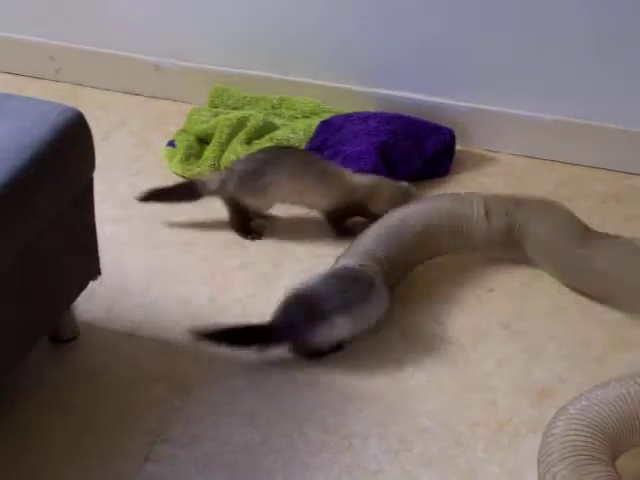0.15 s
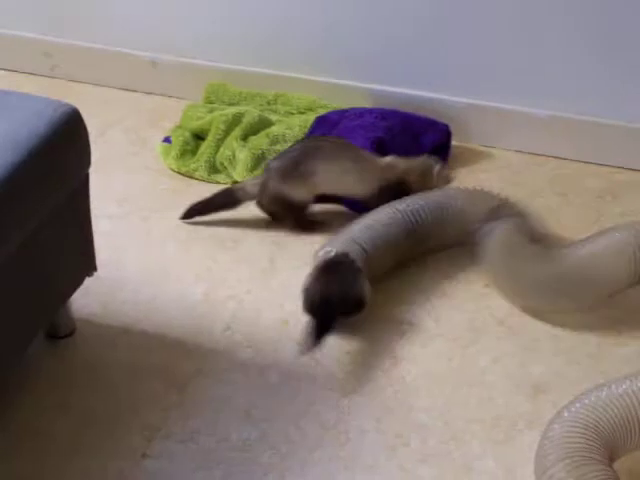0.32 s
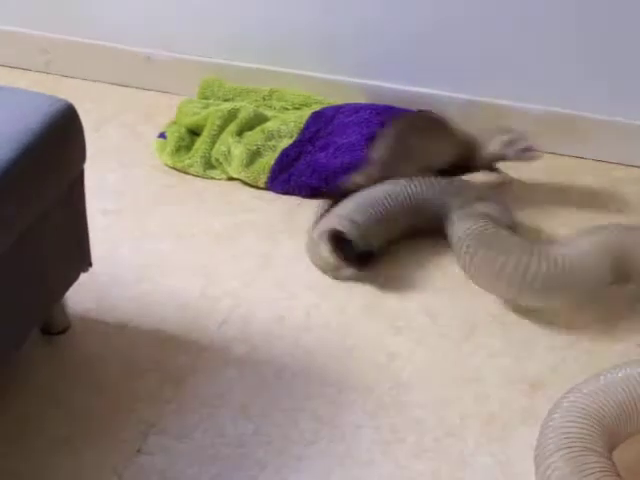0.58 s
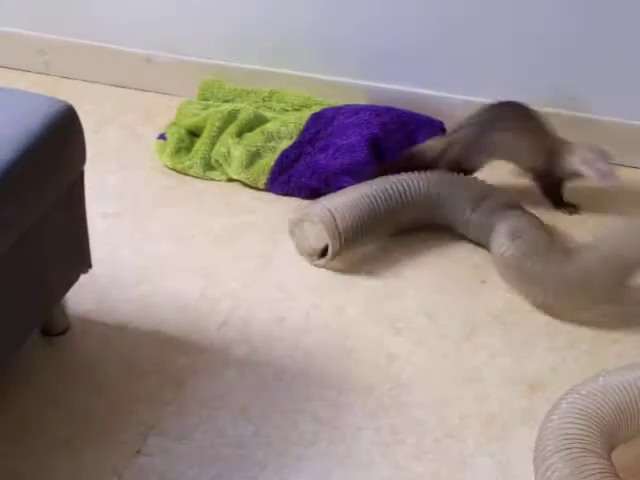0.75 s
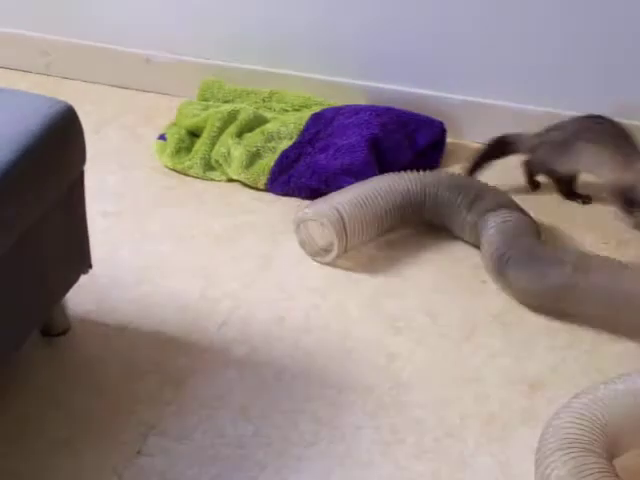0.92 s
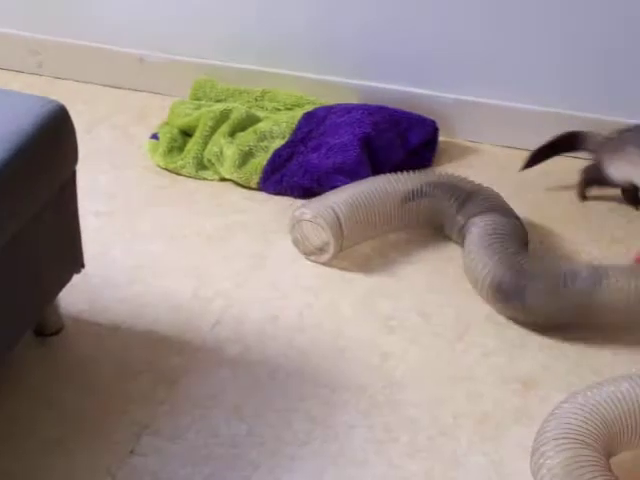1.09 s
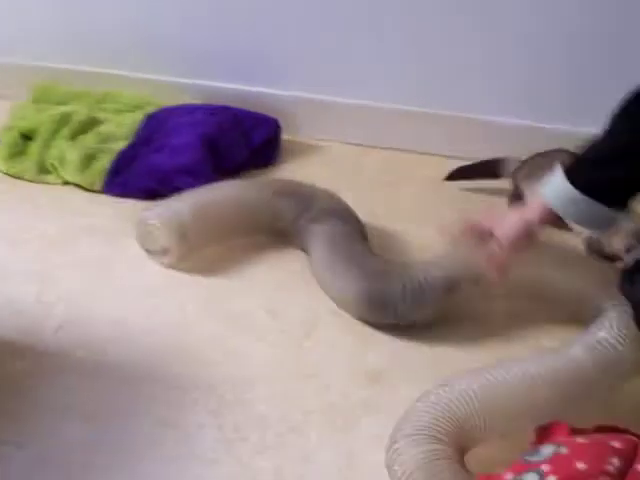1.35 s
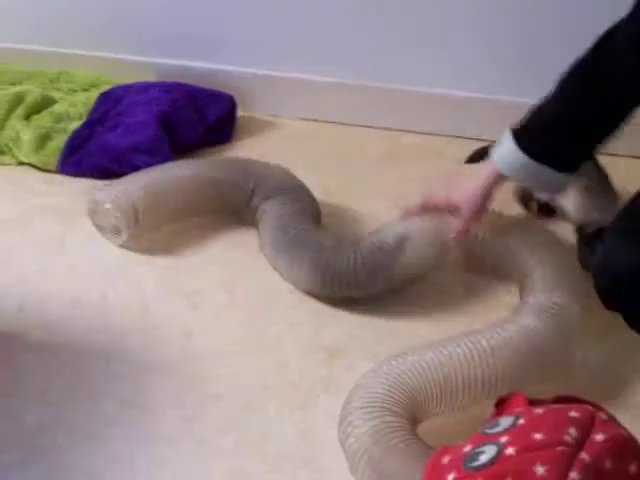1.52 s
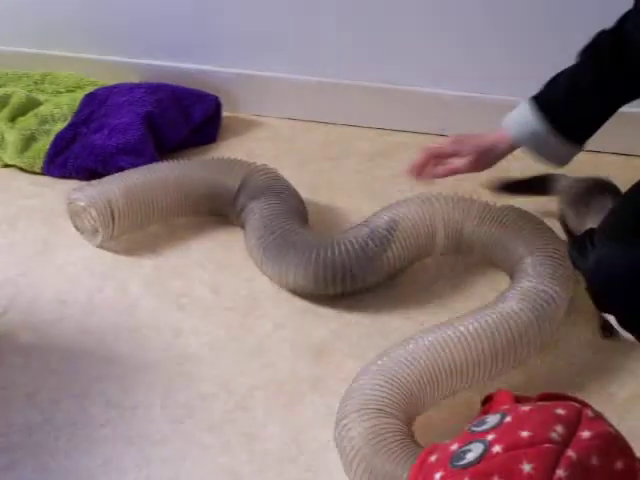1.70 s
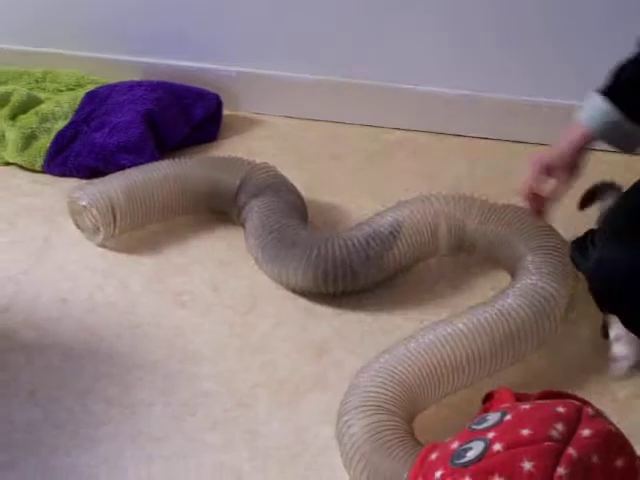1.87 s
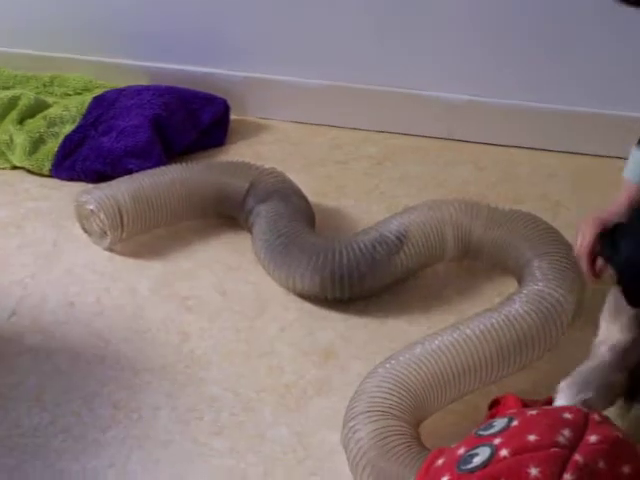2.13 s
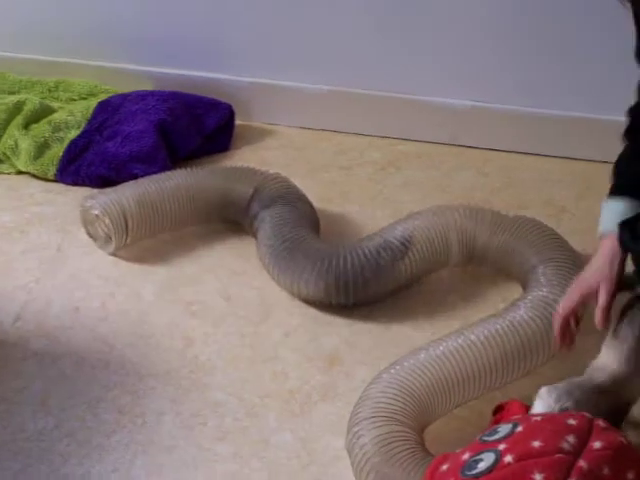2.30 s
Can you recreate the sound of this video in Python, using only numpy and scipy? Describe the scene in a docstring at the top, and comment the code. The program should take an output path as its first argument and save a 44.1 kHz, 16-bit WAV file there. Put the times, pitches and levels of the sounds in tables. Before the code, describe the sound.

A ferret scrambles through a ribbed plastic tunnel on a hard floor in a bare, lightly echoing room. Small cracks begin at about 0.1 s; from 0.35 to 1.3 s come loud, irregular snaps and hollow thumps over dense scraping clicks. Clatter continues more sparsely until a last sharp crack at 1.8 s. Around 2 s there is a soft low bump and a tiny scratch, then faint rustling ticks over quiet room tone.

```python
"""In a bare room with a hard floor, a small animal runs through a ribbed plastic tunnel, a couple of
metres from a camera. Cracks of the wall are noise bursts with a diffuse echo tail and a short rib ring.
Thumps are pushes that excite the modes of the hollow tube; between them the ribs scrape as dense clicks.
Near the end a claw scratches and something soft bumps with a low rumble, shaped noise under a dial of
level; room tone and a deep floor rumble lie beneath."""
import sys
import numpy as np
from scipy import signal
from scipy.fft import rfft, irfft
from scipy.io import wavfile
from scipy.ndimage import uniform_filter1d

SR = 44100
rng = np.random.default_rng(int(sys.argv[2]) if len(sys.argv) > 2 else 0)


def dump(signal):
    """Clip the signal to [-1, 1] and save it as 16-bit WAV at the path in sys.argv[1]."""
    limited = np.clip(np.atleast_2d(signal).T, -1, 1)
    pcm = np.round(limited * 32767).astype(np.int16)
    wavfile.write(sys.argv[1], SR, pcm)


def invert_db(level):
    """Linear amplitude ratio for a level in decibels (20 dB per decade), elementwise."""
    return 10 ** (np.asarray(level, dtype=float) / 20)


N = 103635  # samples

# Cracks of the plastic wall. Each row: start in seconds, nominal level in dB, middle and top colours
# in dB relative to it (before fixed offsets), length in ms, after-rattle in relative dB, ring in Hz.
WALL_CRACKS = [(0.0823, -20.5, -17.5, -23.5, 4.3, -5, 3670), (0.1306, -19.5, -20, -18.5, 3.4, -8.5, 3060),
               (0.221, -20, -7, -12.5, 7.1, -6, 3100), (.2338, -21, -14.5, -7, 4, -5, 3520),
               (.349, -7, -17, -23, 4.6, -4.5, 3050), (.3831, -10, -12.5, -17.5, 5.4, -6.5, 3550),
               (.4755, -5.5, -18, -13, 6.7, -7, 3650), (.5994, -13, -6.5, -13, 3.7, -14, 2940),
               (0.6498, -6, -15.5, -10.5, 4.6, -9, 3120), (0.7003, -2, -15, -20.5, 4.6, -10.5, 2940),
               (.7201, -10, -21, -30, 9.6, -7, 3320), (0.8643, -16, -21, -8, 6, -6.5, 3390),
               (.888, -6.5, -16, -21, 3.2, -6.5, 3620), (1.0306, -18.5, -14.5, -10, 8, -1, 3570),
               (1.048, -6.5, -22.5, -14, 10, -5, 3425), (1.2402, -1, -18.5, -26, 3.94, -20, 3520),
               (1.3124, -27.5, -8.5, -15, 3.9, -8, 3560), (1.424, -17.5, -11, -16.5, 14, -2.5, 3580),
               (1.457, -13, -7, -4, 5.3, -12, 3880), (1.5305, -15, -11, -16, 7.6, -9.5, 3290),
               (1.5792, -10.5, -14.5, -21.5, 1.5, -8.5, 3230), (1.647, -14.5, -16.5, -24.5, 5.3, 1.5, 2570),
               (1.6591, -17.5, -28.5, -39.5, 7.2, -12.5, 4090), (1.671, -12.5, -34, -20.5, 8, -7.5, 3070),
               (1.8031, -7, -19, -41, 4.1, -7.5, 3046), (1.98, -29.5, -26, -36.5, 15, -0.5, 3670),
               (2.131, -31, -28, -9.5, 8.2, -5.5, 3540), (2.3182, -33, -9.5, -11, 6.5, -15.5, 3690)]
# Thumps of the hollow tube. Each row: start in seconds, nominal level in dB, centre of the push in Hz,
# length in ms.
TUBE_THUMPS = [(0.223, -20, 106, 22), (.222, -25.5, 614, 11.7), (0.349, -16.5, 285, 7),
               (0.375, -23.5, 130.6, 19), (.472, -22, 107.5, 16), (0.475, -20, 330, 15),
               (.592, -18.5, 352, 19), (.597, -33, 893, 8), (0.652, -29.5, 120.4, 25),
               (.699, -21.5, 119.3, 20), (.700, -20.5, 1287, 25), (.884, -25.5, 366, 14),
               (0.889, -22, 115.6, 18), (.888, -19, 1510, 9.3), (1.045, -15, 391, 14),
               (1.047, -22, 111.7, 10), (1.238, -20, 363, 13), (1.241, -12, 926, 3.3),
               (1.249, -24, 106.4, 40), (1.312, -36, 135, 16), (1.383, -24, 278, 36),
               (1.419, -20, 255.4, 14), (1.458, -20, 116, 19), (1.458, -17, 375, 15), (1.53, -26, 375, 11),
               (1.648, -19.5, 956, 9.8), (1.658, -26.5, 155, 19), (1.803, -17, 960, 3.7),
               (1.81, -22, 111.5, 9.3), (1.969, -35, 594, 14.8), (1.97, -32.5, 373, 31),
               (2.167, -39, 338, 14), (.226, -24, 935, 12.5), (.1, -39.5, 295, 30)]
# Resonances of the tube. Each row: frequency in Hz, strength in dB, decay time T60 in seconds
# (the drag shortens it).
TUBE_MODES = [(107, -9, .09), (139.6, -0.5, 0.089), (222.5, 2.5, 0.051), (285, 1.5, 0.071),
              (327.4, 3.5, 0.057), (375, -13, 0.081), (624, -7, 0.058), (872, -11, 0.042), (993, -9, 0.03),
              (1250, -2.5, 0.041), (1522, -5.5, 0.059)]
# Ribs dragging over the floor. Each row: time in seconds, nominal level in dB, middle colour in dB
# and tube bass in dB, both relative to that level.
RIB_DRAG = [(0, -49.5, 1.5, -6), (.1, -41, -14, -9.5), (.2, -40, -6.5, -4), (.33, -32, -5.5, -9),
            (.4, -28, 0.5, -1.5), (.45, -33.5, -3, -9.5), (.47, -24.5, -6.5, -1.5), (.55, -31, -2.5, -6),
            (.68, -27, -3.5, -3), (.8, -27.5, -8, -6), (.845, -31, -2.5, -10), (.97, -30, -7, -4),
            (1.13, -28.5, -1.5, -4.5), (1.22, -27.5, -7.5, -7.5), (1.33, -28, -1.5, -8),
            (1.39, -34, -2.5, -5), (1.5, -31.5, -3.5, -9.5), (1.62, -35, -2, 2), (1.76, -39.5, 1, 0),
            (1.92, -49.5, -10.5, 6), (2.0, -45, -16, -14.5), (2.1, -53.5, -13, -1),
            (2.16, -45.5, -6.5, -6.5), (2.26, -56.5, -1, -11), (2.35, -37.5, -6.5, -14)]
# Bright spectrum of the ribs. Each row: frequency in Hz, response in dB.
RIB_COLOUR = [(710, -18.5), (1200, -3.5), (1430, -9), (1550, -12), (2080, -4), (2600, -3.5), (3110, -0.5),
              (3750, 0), (6720, -19.5), (7480, -24.5), (8530, -51), (11100, -57.5), (18800, -120)]
# Spectrum heard through the wall. Each row: frequency in Hz, response in dB.
WALL_COLOUR = [(240, -21.5), (400, -2), (448, -9.5), (618, -2), (714, -3.5), (873, 0.5), (1800, -7),
               (2340, -29.5), (3960, -120)]
# Level of the soft bump. Each row: time in seconds, level in dB.
BUMP_LEVEL = [(1.965, -51), (1.974, -34), (2.0, -30.5), (2.02, -30.5), (2.045, -40), (2.065, -39),
              (2.095, -44), (2.115, -57), (2.15, -53), (2.2, -59)]
# Spectrum of the soft bump. Each row: frequency in Hz, response in dB.
BUMP_COLOUR = [(29, -40), (50, -32), (90, -10), (182, -0.5), (318, -14), (400, -14), (611, -34), (900, -49),
               (1170, -74), (1980, -120)]
# Spectrum of the room tone. Each row: frequency in Hz, response in dB.
AIR_COLOUR = [(12, -49.5), (20, -20.5), (286, 9.5), (463, -6), (965, -14), (1070, -34), (1180, -30),
              (1310, -10.5), (5270, -3), (8530, -25.5), (11100, -54), (18800, -120)]
# Decay times T60 in seconds of after-rattle and echoes, for the bright, middle and top colours.
TAIL_T60_S = (0.41, 0.41, 0.77)

FIRST_ECHO_S = 0.0071
RING_T60_S = 0.011


def unit(x):
    """Normalises to unit rms."""
    return x / np.sqrt(np.mean(x ** 2) + 1e-20)


def col(table, k):
    """Takes one column of a table."""
    return np.array(table, float)[:, k]


def curve(table, k):
    """Interpolates column k linearly over time."""
    return np.interp(np.arange(N) / SR, col(table, 0), col(table, k))


def highpass(x, hz):
    """Second-order high-pass: 12 dB per octave below the corner."""
    return signal.sosfilt(signal.butter(2, hz, "high", fs=SR, output="sos"), x)


def colour(x, points):
    """Minimum-phase filter through (Hz, dB) points, scaled so that white noise keeps its level."""
    f = np.maximum(np.fft.rfftfreq(8192, 1 / SR), 1)
    log_gain = np.interp(np.log(f), np.log(col(points, 0)), col(points, 1)) * np.log(10) / 20
    cepstrum = irfft(log_gain)
    cepstrum[1:4096] *= 2  # folding the cepstrum makes the response causal
    cepstrum[4097:] = 0
    h = irfft(np.exp(rfft(cepstrum)))[:4096]
    return signal.fftconvolve(x, h / np.sqrt(np.sum(h ** 2)))[:N]


def ring(x, hz, t60):
    """A damped mode: one complex pole driven by x."""
    pole = np.exp(2j * np.pi * hz / SR - np.log(1000) / (t60 * SR))
    return signal.lfilter([1], [1, -pole], x).imag


def burst(ms, source):
    """Transient with a fast linear rise and a steep fall around ms; its energy is that of the envelope."""
    t = np.arange(len(source)) / SR
    rise = np.minimum(t / (ms ** 2 * 1.5e-5), 1)
    shape = rise * np.exp(-(t / (max(ms, .5) / 1000)) ** 4)
    return source * shape * np.sqrt(np.sum(shape ** 2) / np.sum((source * shape) ** 2))


def clicks(per_s, spread_db):
    """Impulses at random times, with exponentially distributed dB levels: a few are much stronger."""
    chance, sign, height = rng.random((3, N))
    strength = invert_db(-spread_db * np.log(height + 1 / 50))
    return unit((chance < per_s / SR) * np.sign(sign - .5) * strength)


def ragged(per_s, spread_db, share):
    """Friction noise: grains of clicks over a share of smooth noise."""
    return unit(clicks(per_s, spread_db) + share * rng.standard_normal(N))


def patchy(per_s, spread_db):
    """Contact modulation: a gain that wanders as more or fewer ribs touch."""
    k = int(SR / per_s)
    steps = np.repeat(rng.standard_normal(N // k + 1), k)
    return invert_db(spread_db * uniform_filter1d(steps, k)[:N])


def cracks():
    """Impact and reverberation: a few ms of clatter, then after a gap a decaying rattle and room tail."""
    drive, echo_power = np.zeros((3, N + 2048)), np.zeros((3, N + 2048))
    noise = rng.standard_normal((len(WALL_CRACKS), 3, 2048))
    # a random gain every 32 samples makes the clatter uneven
    noise *= rng.exponential(1, (len(WALL_CRACKS), 1, 64)).repeat(32, axis=2) ** 0.45
    for (s, db, mid_db, top_db, ms, tail_db, _), rows in zip(WALL_CRACKS, noise):
        start, echo = int(s * SR), int((s + FIRST_ECHO_S) * SR)
        for k, rel_db in enumerate((0, mid_db + 11.5, top_db + 17.5)):
            drive[k, start:start + 2048] += invert_db(db + rel_db - 11) * burst(ms, rows[k])
            echo_power[k, echo] += invert_db(db + rel_db - 10 + tail_db) ** 2
    for k, t60 in enumerate(TAIL_T60_S):
        early, late = (signal.lfilter([1], [1, -np.exp(-np.log(1e6) / (d * SR))], echo_power[k, :N])
                       for d in (t60 * 0.2, t60))
        # the average looks back only, so the tail never precedes its crack
        power = uniform_filter1d(early + invert_db(-2.5) ** 2 * late, size=151, origin=75)
        rattle = patchy(per_s=120, spread_db=1.5) * ragged(per_s=1500, spread_db=2.0, share=1.82)
        drive[k, :N] += np.sqrt(np.maximum(power, 0)) * rattle
    bright, middle, top = drive[:, :N]
    return colour(bright, RIB_COLOUR) + colour(middle, WALL_COLOUR) + colour(highpass(top, 5000), RIB_COLOUR)


def rings():
    """Local resonance: each crack and its after-rattle excite one rib mode, short and rough."""
    out, t = np.zeros(N + 8192), np.arange(8192) / SR
    noise = rng.standard_normal((len(WALL_CRACKS), 8192))
    gain = np.sqrt(4 * np.log(1000) / (RING_T60_S * SR))  # offsets the build-up of the mode under noise
    for (s, db, _, _, ms, tail_db, hz), row in zip(WALL_CRACKS, noise):
        onset = np.clip((t - FIRST_ECHO_S) / .003, 0, 1)
        after = invert_db(tail_db) * onset * np.exp(-np.log(1000) * t / 0.29)
        start = int(s * SR)
        out[start:start + 8192] += invert_db(db - 13.5) * gain * ring(burst(ms, row) + after * row, hz, RING_T60_S)
    return out[:N]


def tube_gains(hz):
    """Modal excitation: modes near the centre of the push respond most, 13 dB less per octave away."""
    return invert_db(col(TUBE_MODES, 1) - 13 * np.abs(np.log2(col(TUBE_MODES, 0) / hz)))


def thumps():
    """Modal sum: an uneven push rings the tube, its modes bent a little each time; the room carries it on."""
    out, t = np.zeros(N + 16384), np.arange(16384) / SR
    noise = rng.standard_normal((len(TUBE_THUMPS), 2, 16384))
    bend = 1 + 0.023 * rng.standard_normal((len(TUBE_THUMPS), len(TUBE_MODES)))
    fade = (t > FIRST_ECHO_S) * np.exp(-np.log(1000) * t / .3)  # room T60 0.3 s
    for (s, db, hz, ms), (row, echo), bent in zip(TUBE_THUMPS, noise, bend):
        push = burst(ms, np.sin(2 * np.pi * hz * t) + 1.9 * row)
        body = sum(g * ring(push, f * b, t60)
                   for g, b, (f, _, t60) in zip(tube_gains(hz), bent, TUBE_MODES))
        body = invert_db(db - 1) * body / np.abs(body).max()
        wet = signal.fftconvolve(body, echo * fade)[:16384]
        start = int(s * SR)
        out[start:start + 16384] += body + invert_db(-6) * unit(wet) * np.std(body)  # room 6 dB below the body
    return highpass(out[:N], 70)


def drag():
    """Friction: ribs catch on the floor in dense clicks, heard bright, through the wall and through the tube."""
    ribs = ragged(per_s=1200, spread_db=4., share=1.2)
    jolts = ragged(per_s=300, spread_db=1.5, share=2.5)
    tube = sum(invert_db(db) * ring(jolts, f, 0.38 * t60) for f, db, t60 in TUBE_MODES if f < 700)
    grit = ragged(per_s=1600, spread_db=2.5, share=1.1) * patchy(per_s=37, spread_db=3.)
    fine = highpass(grit, 4500)
    bright = colour(ribs * patchy(per_s=66, spread_db=1.5) + invert_db(-1) * fine, RIB_COLOUR)
    wall = invert_db(curve(RIB_DRAG, 2)) * unit(colour(ribs + .5 * jolts, WALL_COLOUR))
    bass = invert_db(curve(RIB_DRAG, 3)) * unit(highpass(tube, 80))
    return invert_db(curve(RIB_DRAG, 1)) * (bright + wall + bass)


def tick():
    """Excited resonance: a small claw scratch, a noise burst through one short bright mode."""
    push, start = np.zeros(N), int(2.072 * SR)
    push[start:start + 2048] = burst(17.0, rng.standard_normal(2048))
    out = ring(push, hz=2470, t60=.008)
    return invert_db(-34) * out / np.abs(out).max()


def bump():
    """Envelope-shaped noise: a low rolling rumble, as of something soft brushing close by."""
    t = np.arange(N) / SR
    on = (t > BUMP_LEVEL[0][0]) & (t < BUMP_LEVEL[-1][0])
    roll = colour(rng.standard_normal(N), BUMP_COLOUR)
    local_rms = np.sqrt(uniform_filter1d(roll ** 2, size=700) + 1e-12)
    return on * invert_db(curve(BUMP_LEVEL, 1)) * roll / local_rms


def floor_rumble():
    """Structure-borne sound: the building's steady deep rumble, raised as the floor shakes under the drag."""
    band = signal.butter(2, [18, 60], "band", fs=SR, output="sos")
    deep = unit(signal.sosfilt(band, rng.standard_normal(N)))
    shake = invert_db(curve(RIB_DRAG, 1) - 22)  # 22 dB below the drag's nominal level
    return (invert_db(-65.5) + shake) * deep


def room_tone():
    """Stationary background: filtered white noise at -51 dB rms."""
    return invert_db(-51) * unit(colour(rng.standard_normal(N), AIR_COLOUR))


def scene():
    """Superposition: the tube's sounds, scratch and bump add linearly to the background."""
    tunnel = cracks() + rings() + thumps() + drag()
    return (tunnel + tick() + bump() + floor_rumble() + room_tone())[None]


def roll_off(x):
    """The treble ends steeply here."""
    return signal.sosfilt(signal.butter(12, 8680, fs=SR, output="sos"), x)


def record(dry):
    """Band limiting and clipping: the camera thins the deep bass, cuts the top and clips beyond 0.7."""
    x = signal.sosfilt(signal.butter(1, 25, "high", fs=SR, output="sos"), dry)
    x = signal.sosfilt(signal.ellip(8, .3, 60, 8700, fs=SR, output="sos"), x)
    mix = np.clip(x, -.7, .7)
    return roll_off(mix)


dry = scene()
out = record(dry)
dump(out)
```